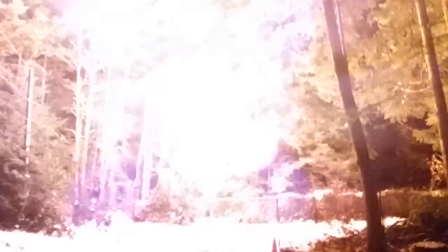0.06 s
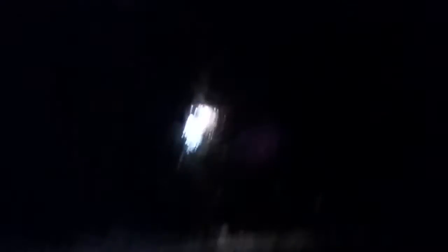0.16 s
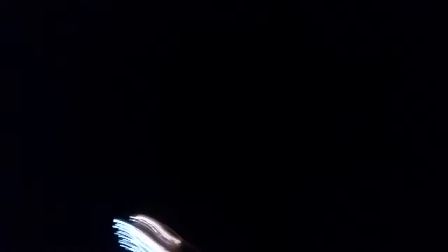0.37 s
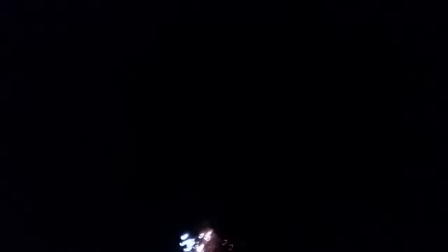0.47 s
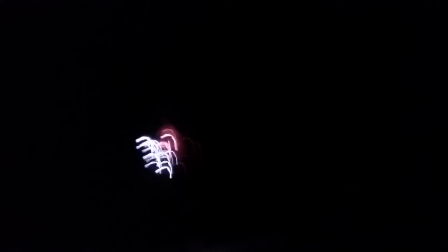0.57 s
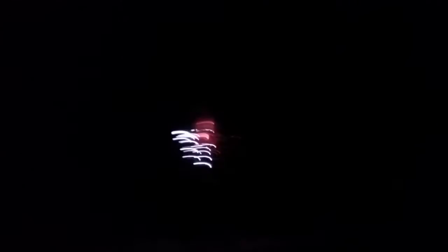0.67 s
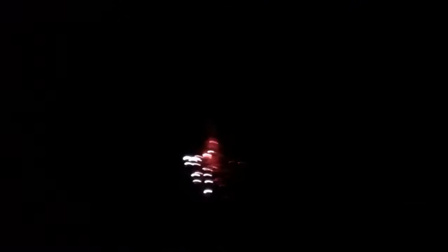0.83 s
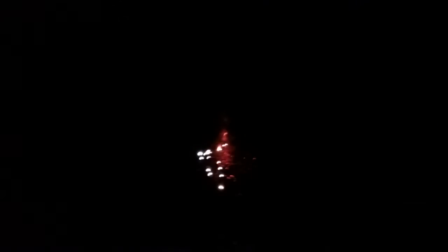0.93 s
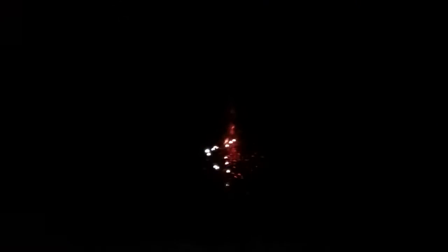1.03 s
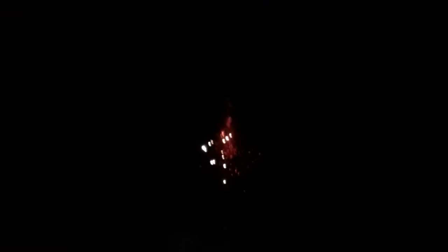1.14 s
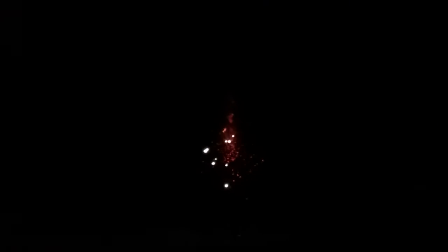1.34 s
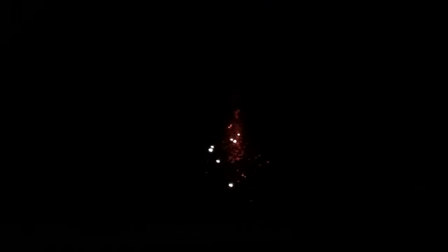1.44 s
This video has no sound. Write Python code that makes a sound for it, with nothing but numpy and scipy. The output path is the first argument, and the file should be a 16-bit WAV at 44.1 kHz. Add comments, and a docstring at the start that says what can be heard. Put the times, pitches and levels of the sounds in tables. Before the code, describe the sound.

Two sharp electrical arc bangs from a power line, followed by sizzling and distant rumble.

```python
"""A mains buzz sputters up out of the night air: a power line is arcing into a tree.
Two flashovers bang as the arc heats the air abruptly, the first with a deep thump.
Houses and trees scatter each bang, sparks snap and sizzle, and a far rumble swells at the end.
The microphone overloads on the loudest peaks."""
import sys
import numpy as np
from scipy import signal
from scipy.fft import rfft, irfft
from scipy.io import wavfile

SR = 44100
rng = np.random.default_rng(int(sys.argv[2]) if len(sys.argv) > 2 else 0)


def store_pcm(level_fs):
    """Save levels as 16-bit WAV."""
    pcm = np.round(np.clip(level_fs, -1, 1) * 32767).astype(np.int16)
    wavfile.write(sys.argv[1], SR, np.atleast_2d(pcm).T)


N = 66150
T = np.arange(N) / SR

# flashovers (time [s], crack level [dB], crack hold [s], crack t60 factor [1], echo delay [s],
# echo level [dB], echo hold [s], echo t60 factor [1], echo bass gain [dB])
FLASHOVERS = [(0.2133, -6, 0.0068, 0.99, 0.026, -16.5, 0.049, .33, -3),
              (0.4758, -6.5, 0.00067, 1.8, 0.0043, -17.5, 0.0083, 0.94, -0.5)]
# spectrum of a crack (frequency [Hz], relative density [dB], base t60 [s])
CRACK_BANDS = [(30, -36, .1), (87.5, -8, 0.07), (199, 0, 0.05), (413, 1, 0.036), (710, -6, 0.027),
               (1230, -8.5, 0.048), (1570, -13, .05), (3350, -12.5, 0.026), (4480, -3, 0.046),
               (6150, -18.5, 0.037), (8300, -15.5, 0.0099), (12100, -19, 0.01), (16000, -23, 0.0087)]
# ringing after the first blast (frequency [Hz], level [dB], t60 [s])
RING_MODES = [(124, -22, 0.25), (262.7, -16.5, 0.34), (277.9, -18.5, 0.77), (416, -26.5, 0.55),
              (1178, -3, 0.046), (1220, -10, 0.049)]
# arcing before each flashover (time of full strength [s], level [dB])
ARC_SURGES = [(.19, -29), (.425, -34.5)]
# spectrum of the arc (frequency [Hz], relative density [dB])
ARC_SPECTRUM = [(40, -10), (120, 13.5), (300, -0.5), (1500, -4.5), (3000, -3), (4300, 0.5), (6500, -7),
                (9500, -14.5), (15000, -11)]
# spectrum of the scattered echo (frequency [Hz], relative density [dB], base t60 [s])
ECHO_BANDS = [(30, -26, 0.66), (63, -5, 1.15), (119, 0.5, 1.13), (199, 2.5, 1.04), (297, 4, 1.19),
              (494, -1, 1.38), (1020, -5, 1.64), (2380, -7.5, 1.37), (3170, -10.5, 1.45), (4490, -2, 1.05),
              (5290, -10, 0.97), (7250, -22.5, 0.88), (8330, -25, 0.79), (15000, -24.5, 0.67)]
# low thuds (centre time [s], frequency [Hz], half width [s], level [dB])
THUD_PULSES = [(0.26, 58.3, .018, -26), (.296, 123, 0.018, -15), (0.379, 117, 0.01, -22),
               (.482, 168, 0.0044, -11.5), (0.502, 58, 0.016, -35), (.525, 166.2, 0.013, -25),
               (0.632, 59, 0.024, -42)]
# snapping sparks (time [s], level [dB])
SNAP_EVENTS = [(0.4176, -1), (1.316, -42)]
# partials of a snap (frequency [Hz], relative level [dB], t60 [s])
SNAP_PARTIALS = [(4460, -11, 0.0076), (8200, -7, 0.004), (9950, -4.5, .0035), (14300, 0, .003)]
# sizzles of burning debris (centre time [s], half width [s], level [dB])
SIZZLE_SWELLS = [(.685, 0.016, -50), (0.737, 0.0076, -41.5), (0.823, 0.035, -47.5), (.97, 0.05, -61),
                 (1.028, 0.03, -47.5)]
# spectrum of the sizzle (frequency [Hz], relative density [dB])
SIZZLE_SPECTRUM = [(1000, -12), (5000, 2), (8500, -9), (11500, 2.5), (13000, -4), (15000, -7)]
# thin frying of the burning branch (frequency [Hz], relative density [dB])
FRY_SPECTRUM = [(2000, -35), (9000, -34), (10500, -1), (11400, 11), (12700, -19), (14300, 5), (16000, 1)]
# course of the far rumble (time [s], level [dB])
RUMBLE_LEVELS = [(.55, -31), (.9, -36.5), (1.1, -36), (1.28, -36.5), (1.4, -34), (1.5, -31.5)]
# spectrum of the far rumble (frequency [Hz], relative density [dB])
RUMBLE_SPECTRUM = [(30, -43), (70, -15), (130, 0), (300, 2.5), (450, -4.5), (680, -2.5), (1100, -9),
                   (2200, -14), (3300, -21), (4500, -20), (6500, -42.5), (15000, -39)]
# spectrum of the night air (frequency [Hz], relative density [dB])
AIR_SPECTRUM = [(30, -13), (70, 4), (200, -3.5), (400, -2.5), (700, 2), (950, -5.5), (3000, -10.5),
                (4400, -8), (6500, -17), (9000, -21), (15500, -18)]

FIRST_BANG_S, SECOND_BANG_S = FLASHOVERS[0][0], FLASHOVERS[1][0]
RESTRIKE_HZ = 120  # twice the mains frequency
ECHO_GRAIN_DB = 1.5


def cracks():
    """Thermal expansion: each flashover heats the air abruptly and radiates a short, rough blast."""
    blasts = sum(undb(db) * burst(CRACK_BANDS, start, 0.00014, hold, t60_factor, grain_db=0.5)
                 for start, db, hold, t60_factor, *_ in FLASHOVERS)
    return signal.sosfilt(signal.butter(2, 75, "high", fs=SR, output="sos"), blasts)


def thump(start_hz=132.3, end_hz=96.6, sag_s=0.026, peak_s=0.0098, fade_s=0.028):
    """Damped oscillation: the first blast drives a low wave of falling pitch and leaves a ringing."""
    age = np.maximum(T - FIRST_BANG_S, 0)
    hz = end_hz + (start_hz - end_hz) * np.exp(-age / sag_s)
    swell = np.minimum(age / peak_s, 1) * gaussian(np.maximum(age - peak_s, 0), fade_s)
    wave = -np.sin(2 * np.pi * np.cumsum(hz * (age > 0)) / SR) * swell
    ring = sum(undb(db) * np.sin(2 * np.pi * mode_hz * age) * envelope(FIRST_BANG_S, 0.0024, 0, t60)
               for mode_hz, db, t60 in RING_MODES)
    return undb(-2) * wave + ring


def buzz(rise_db_per_s=432, restrike_s=0.23):
    """Periodic excitation: the arc restrikes each half cycle of the mains and grows until flashover."""
    growth = sum(undb(db + rise_db_per_s * np.minimum(T - full_s, 0)) * (T < bang[0])
                 for (full_s, db), bang in zip(ARC_SURGES, FLASHOVERS))
    age = (T - restrike_s) % (1 / RESTRIKE_HZ)
    strike = noise(ARC_SPECTRUM)[(age * SR).astype(int)]  # the same waveform at every restrike
    hiss = undb(-0.5) * noise(ARC_SPECTRUM)
    gate = np.interp(age, T, envelope(0, attack=0.0017, hold=0.0048, t60=0.025))
    hum = undb(-53.5) * np.sin(2 * np.pi * RESTRIKE_HZ * T) * (T < FIRST_BANG_S)
    return (strike + hiss) * gate * growth + hum


def spit():
    """Irregular discharge radiates broadband noise: the first arc spits on briefly after its crack."""
    return undb(-17.5) * envelope(FIRST_BANG_S, 0.0044, hold=0.011, t60=0.071) * noise(ARC_SPECTRUM)


def echoes(attack_s=0.0067, bass_hz=453):
    """Scattering: houses and trees return each bang as a diffuse tail whose midrange lasts longest."""
    lowpass = signal.butter(1, bass_hz, fs=SR, output="sos")
    tails = 0
    for start, _, _, _, delay, db, hold, t60_factor, bass_db in FLASHOVERS:
        scatter = undb(db) * burst(ECHO_BANDS, start + delay, attack_s, hold, t60_factor, ECHO_GRAIN_DB)
        bass_shelf = (undb(bass_db) - 1) * signal.sosfilt(lowpass, scatter)
        tails = tails + scatter + bass_shelf
    return tails


def thuds():
    """Wave packets: the bass of the blasts and their echoes arrives in pulses a few cycles long."""
    return sum(undb(db) * gaussian(T - centre, half_width) * np.sin(2 * np.pi * hz * (T - centre))
               for centre, hz, half_width, db in THUD_PULSES)


def slap():
    """Specular reflection: one wall returns the second bang as a short, distinct echo."""
    level = undb(-25.5) * envelope(start=0.6, attack=0.0043, hold=0.011, t60=0.061)
    return level * noise(ECHO_BANDS, ECHO_GRAIN_DB)


def snaps():
    """Impulse excitation: each bursting spark gives a bright ping of quickly damped partials."""
    return sum(undb(db + partial_db) * np.sin(2 * np.pi * hz * (T - start)) * envelope(start, 1e-4, 0, t60)
               for start, db in SNAP_EVENTS for hz, partial_db, t60 in SNAP_PARTIALS)


def burning(hiss_full_s=1.53, hiss_db_per_s=70):
    """Combustion noise: debris sizzles, the branch fries after the second bang, a late hiss creeps in."""
    swells = sum(undb(db) * gaussian(T - centre, half_width) for centre, half_width, db in SIZZLE_SWELLS)
    late_hiss = undb(-52.5 + hiss_db_per_s * np.minimum(T - hiss_full_s, 0))
    sizzle = (swells + late_hiss) * noise(SIZZLE_SPECTRUM, grain_db=2.5)
    fry_level = undb(-51.5) * envelope(SECOND_BANG_S, attack=0.02, hold=0.061, t60=1.4)
    return sizzle + fry_level * noise(FRY_SPECTRUM, grain_db=3.5)


def far_rumble():
    """Long-path reflection: after the second bang a dull rumble rolls back from far away and swells."""
    level = undb(np.interp(T, *np.array(RUMBLE_LEVELS).T)) * (T > SECOND_BANG_S)
    return level * noise(RUMBLE_SPECTRUM, grain_db=1.0)


def night_air(level_db=-46, drop_db=17):
    """Ambient noise: a faint wash that sinks for one second after the first bang."""
    return undb(level_db - drop_db * np.clip(T - FIRST_BANG_S, 0, 1)) * noise(AIR_SPECTRUM)


def undb(db):
    """Decibels to amplitude ratio."""
    return 10 ** (np.asarray(db) / 20)


def along(hz, table, column=1):
    """Interpolation of a table column on a log-frequency axis."""
    rows = np.array(table, float)
    return np.interp(np.log(np.maximum(hz, 1)), np.log(rows[:, 0]), rows[:, column])


def gaussian(offset, half_width):
    """Bell curve that falls to 1/e at half_width."""
    return np.exp(-(offset / half_width) ** 2)


def envelope(start, attack, hold, t60):
    """Linear attack and, from hold seconds after the start, exponential decay of 60 dB per t60."""
    age = T - start
    return np.clip(age / attack, 0, 1) * np.exp(-np.log(1000) * np.maximum(age - hold, 0) / t60)


def noise(spectrum, grain_db=0):
    """Spectrally shaped noise of rms 1; random level steps of spread grain_db make it crackle."""
    grains = np.repeat(rng.standard_normal(N), 32)[:N]
    white = rng.standard_normal(N) * undb(grain_db * grains)
    hz = np.arange(N // 2 + 1) * SR / N
    bass_cut = hz ** 2 / (hz ** 2 + 25 ** 2)
    coloured = irfft(rfft(white) * undb(along(hz, spectrum)) * bass_cut, N)
    return coloured / coloured.std()


def burst(table, start, attack, hold, t60_factor, grain_db, bands=24):
    """Frequency-dependent damping: grainy noise in bands, each decaying at its own rate."""
    centres = np.geomspace(30, 16000, bands)
    bin_hz = np.arange(N // 2 + 1) * SR / N
    band_position = np.interp(np.log(bin_hz + 1), np.log(centres), np.arange(bands))
    spectrum = rfft(noise(table, grain_db))
    total = 0
    for k, hz in enumerate(centres):
        band = irfft(spectrum * np.maximum(1 - abs(band_position - k), 0), N)
        total = total + band * envelope(start, attack, hold, t60_factor * along(hz, table, column=2))
    return total


def scene():
    """Superposition: the pressures of all sources add at one microphone."""
    arc = buzz() + cracks() + spit() + thump()
    reflections = thuds() + echoes() + slap()
    return (arc + reflections + snaps() + burning() + night_air() + far_rumble())[None]


def record(dry, cutoff_hz=15800):
    """Saturation and band limiting: the microphone clips the blast and cuts the highest treble."""
    lowpass = signal.ellip(8, 0.2, 70, cutoff_hz, fs=SR, output="sos")
    return signal.sosfilt(lowpass, np.clip(dry, -0.95, 0.95))


dry = scene()
out = record(dry)
store_pcm(out)
```